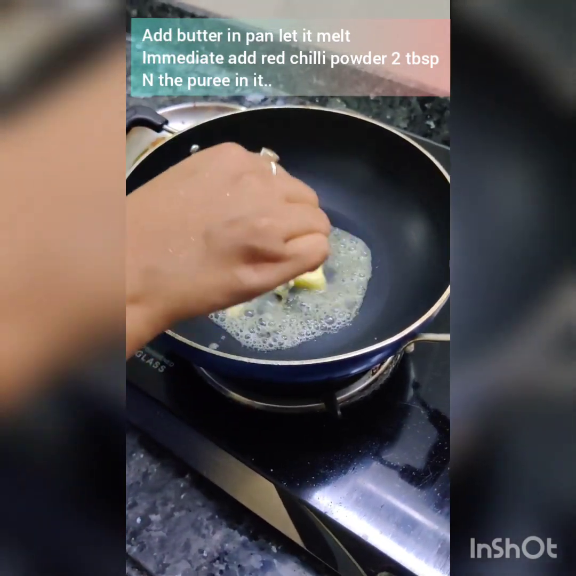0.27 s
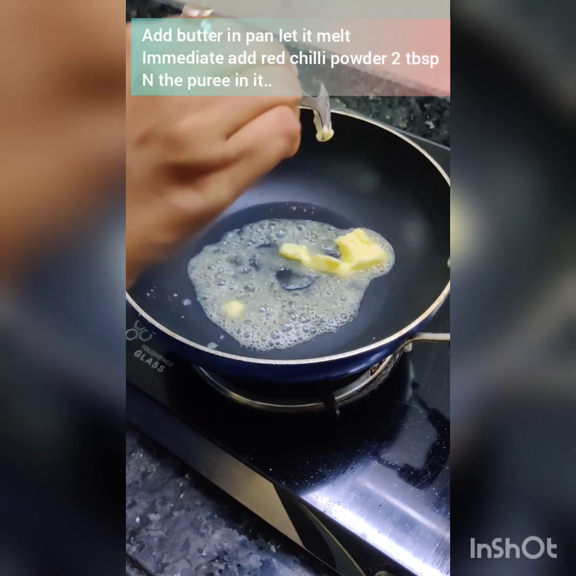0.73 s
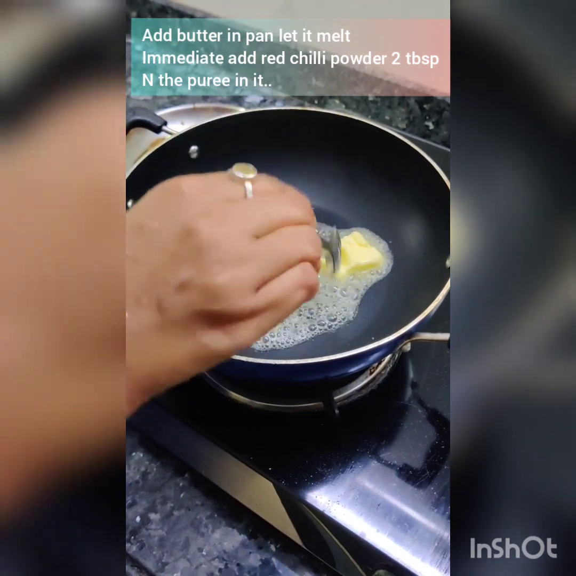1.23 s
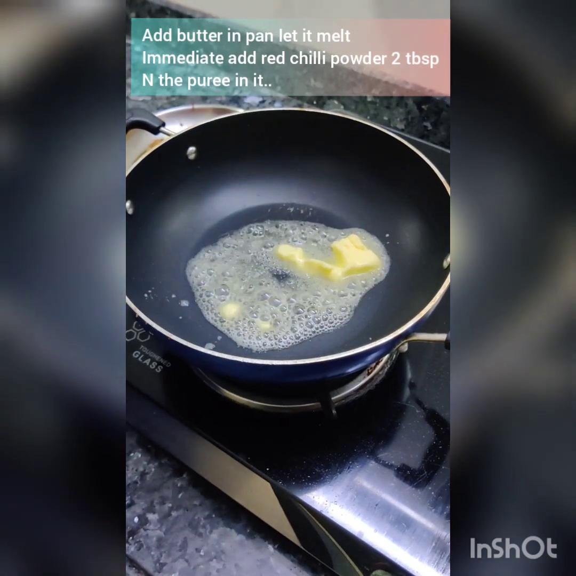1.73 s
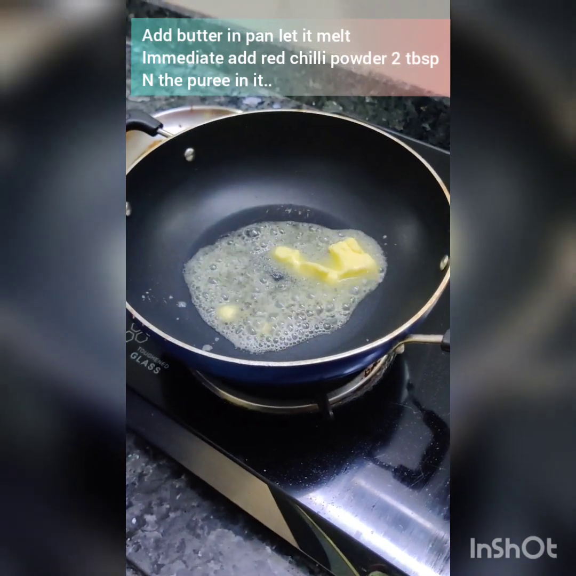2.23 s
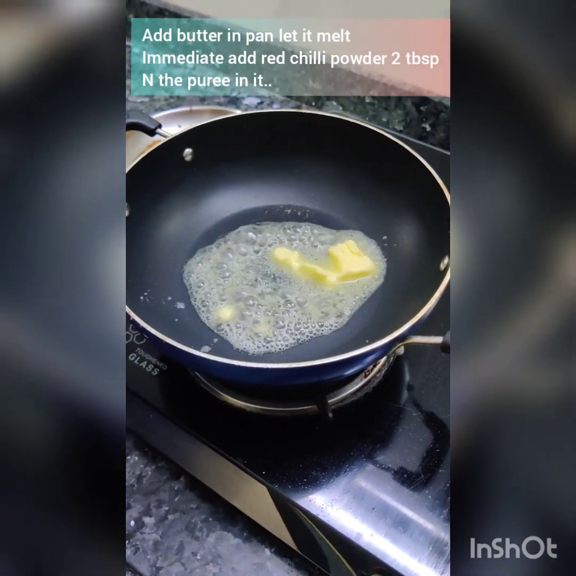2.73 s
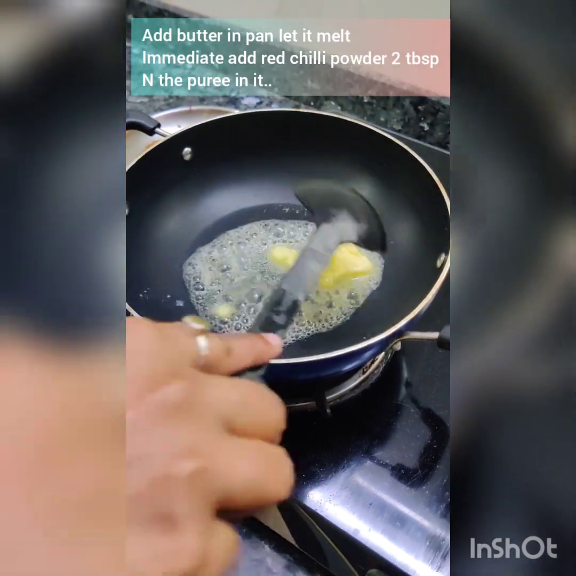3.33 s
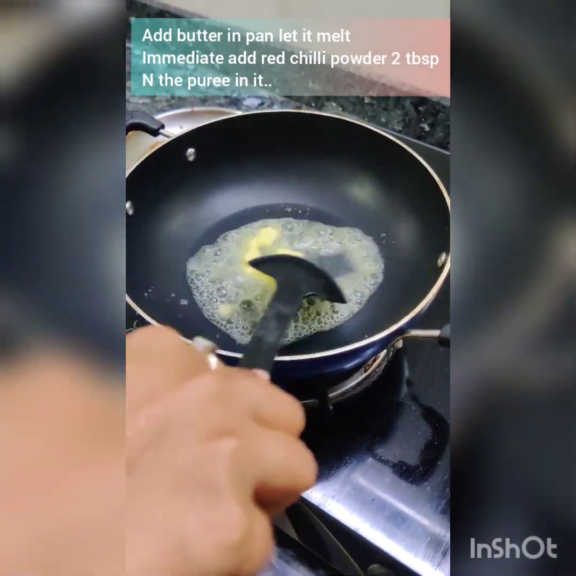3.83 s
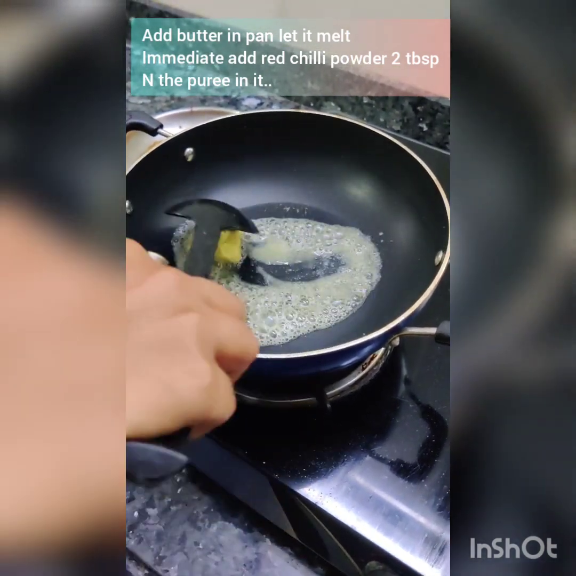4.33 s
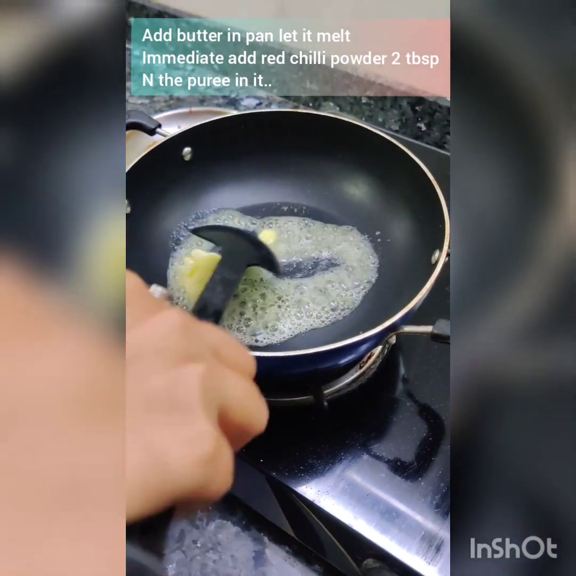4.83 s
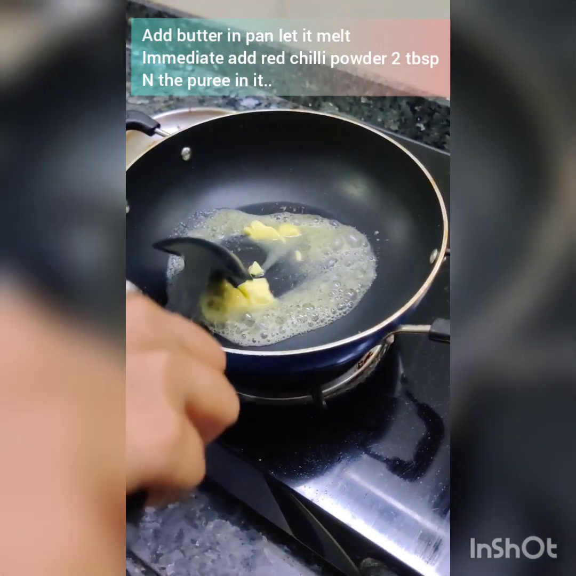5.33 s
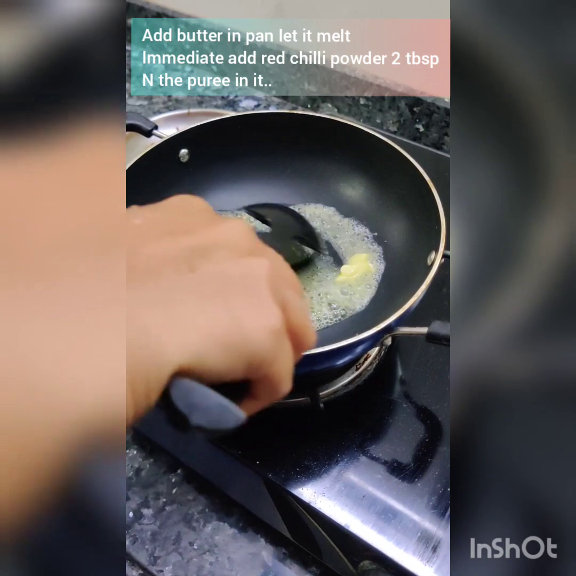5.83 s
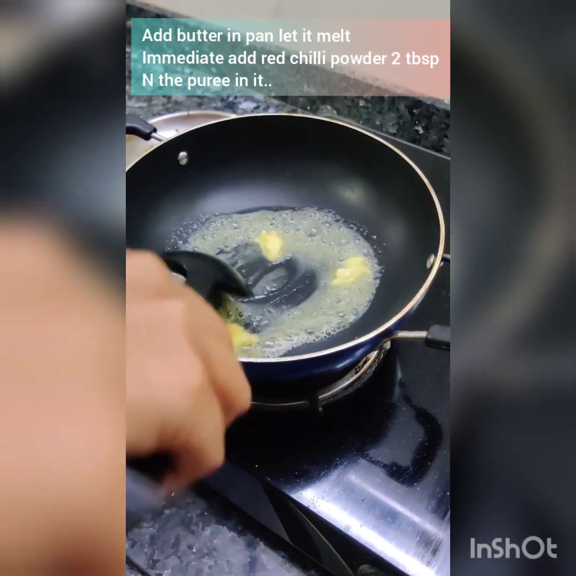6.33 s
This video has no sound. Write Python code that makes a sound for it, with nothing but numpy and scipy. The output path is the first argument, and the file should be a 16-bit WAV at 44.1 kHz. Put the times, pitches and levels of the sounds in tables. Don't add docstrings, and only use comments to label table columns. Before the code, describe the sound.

Butter sizzles and spits close up in a coated pan while a spatula knocks and scrapes it and a spoon clinks on stone.

```python
import sys
import numpy as np
from scipy import signal
from scipy.fft import rfft, irfft, next_fast_len
from scipy.io import wavfile
from scipy.ndimage import uniform_filter1d

SR = 44100
rng = np.random.default_rng(int(sys.argv[2]) if len(sys.argv) > 2 else 0)


def transcribe(signal):
    frames = np.atleast_2d(signal).T
    limited = np.clip(frames, -1, 1)
    pcm = np.round(limited * 32767).astype(np.int16)
    wavfile.write(sys.argv[1], SR, pcm)


def linear_from_db(decibels):
    return 10 ** (np.asarray(decibels, float) / 20)


N = 290927

# frequency in Hz, level in dB, t60 in seconds.
PAN_MODES = [(816, -15, 0.033), (860, -3, 0.03), (919.5, -0.5, 0.065), (960, -8, 0.03), (987, 2, 0.045),
             (1060, -6, 0.024), (1204, -9, 0.062), (1346, -6.5, 0.039), (1510, -3, 0.019), (1710, 1, 0.025),
             (1890, -4, 0.022), (2174, -9, 0.046), (2610, 1.5, 0.01), (2916, -10.5, 0.055),
             (3173, -4.5, 0.039), (3540, -12, 0.011), (4310, -7, 0.021), (4870, -28, .015),
             (6300, -30, .02)]


def evened(x):
    return x / np.sqrt(np.mean(x ** 2) + 1e-20)


def read(points, hz):
    f, value = np.transpose(points)
    return np.interp(np.log(hz + 1), np.log(f + 1), value)


def curve(rows):
    s, db = np.transpose(rows)
    return linear_from_db(np.interp(np.arange(N) / SR, s, db, -120, -120))


def add(mix, s, sound):
    part = mix[..., round(s * SR):][..., :sound.shape[-1]]
    part += sound[..., :part.shape[-1]]


def side_gains(db, left_right_db):
    return linear_from_db(db + np.array([[.5], [-.5]]) * left_right_db)


def slow_waver(samples):
    once = uniform_filter1d(rng.standard_normal(N), samples)
    return evened(uniform_filter1d(once, samples))


def coloured(x, points):
    log_gain = read(points, abs(np.fft.fftfreq(2048, 1 / SR))) * np.log(10) / 20
    taps = np.fft.ifft(np.exp(np.conj(signal.hilbert(log_gain)))).real[:1024]
    return signal.oaconvolve(x, taps[None], axes=1)[:, :N]


def modes(hz, t60, seconds, contact_s=0.00046):
    t = np.arange(round(seconds * SR))[:, None] / SR
    return (1 - np.exp(-t / contact_s)) * np.exp(t * (2j * np.pi * hz - np.log(1000) / t60))


def ring(bank, db, phase):
    return (bank @ (linear_from_db(db) * np.exp(1j * phase))).imag


def stroke(start, hold, db, press_s=0.011, lift_db_per_s=167):
    age = np.arange(N) / SR - start
    lift_db = lift_db_per_s * np.maximum(age - press_s - hold, 0)
    return np.clip(age / press_s, 0, 1) * linear_from_db(db - lift_db)


def late(x):
    return np.array([x[0], np.roll(x[1], 16)])


def fan():
    # multiple of the shaft speed, level in dB rms, frequency waver in Hz.
    shaft_orders = [(1, -53.5, .1), (2, -67, 0.049), (3, -56, 0.054), (5, -43.5, 0.13), (6, -74, 0.35),
                    (10, -60, 4.04), (14.9, -52.5, 5.66)]
    # frequency in Hz, level in dB per Hz.
    air_spectrum = [(12, -32), (20, -10), (45, -2), (75, -11.5), (105, -10), (140, -9.5), (230, -15),
                    (400, -16.5), (650, -17.5), (1000, -23), (2500, -34.5), (4000, -46)]
    # frequency in Hz, correlation from 0 to 1.
    air_likeness = [(20, .996), (180, .995), (250, .93), (350, .7), (600, .35), (1000, .2), (2500, .2)]
    shaft_hz, mains_hz, mains_db, air_db = 22.21, 101, -44.5, -42

    t = np.arange(N) / SR
    tones = linear_from_db(mains_db) * np.sin(2 * np.pi * mains_hz * t + 1.07)
    for multiple, db, waver_hz in shaft_orders:
        drift = slow_waver(3000)
        phase = 2 * np.pi * np.cumsum(multiple * shaft_hz + waver_hz * drift) / SR
        tones = tones + linear_from_db(db + 3.05 * np.roll(drift, SR)) * np.sin(phase)

    frames, hz = N // 512 + 5, np.fft.rfftfreq(2048, 1 / SR)
    a, b, c, d = rng.standard_normal((frames, 1025, 4)).T
    same = np.clip(read(air_likeness, hz), -1, 1)[:, None]
    left, other = a + 1j * b, c + 1j * d
    right = same * left + np.sqrt(1 - same ** 2) * other
    spectra = np.array([left, right]) * linear_from_db(read(air_spectrum, hz))[:, None]
    air = signal.istft(spectra, nperseg=2048, noverlap=1536)[1][:, :N]
    return np.sqrt(2) * tones + linear_from_db(air_db) * evened(air)


def kitchen(sources, turns_per_s=3.7):
    # frequency in Hz, t60 in seconds.
    room_t60 = [(200, 0.39), (1000, 0.56), (4000, 0.58), (8000, 0.19), (16000, 0.034)]
    taps = np.zeros((6, SR // 2))
    at = np.arange(160, SR // 2 - 20, 20)
    at = at + rng.integers(0, 20, (6, (SR // 2 - 161) // 20))
    np.put_along_axis(taps, at, rng.choice([-1., 1.], at.shape), 1)

    hz, t, z = signal.stft(taps, SR, nperseg=256)
    decay = linear_from_db(-60 * t / read(room_t60, hz)[:, None]) * (hz[:, None] > 250)
    tail = signal.istft(z * decay, SR, nperseg=256)[1]
    tail = tail / np.linalg.norm(tail[0])

    sent = sum(linear_from_db(echo_db) * x.mean(0) for x, echo_db in sources)
    pattern = np.repeat(np.arange(3), 2)[:, None]
    turn = np.sqrt(2 / 3) * np.cos(np.pi * (turns_per_s * np.arange(N) / SR + pattern / 3))
    echoes = signal.fftconvolve(sent * turn, tail, axes=1)[:, :N]
    return late(sum(x for x, _ in sources)) + echoes.reshape(3, 2, N).sum(0)


def steel_on_stone(table, hits, tick_db):
    hz, left_db, right_db, t60 = np.transpose(table)
    bank, out = modes(hz, t60, .5), np.zeros((2, N))
    for (s, db, left_right_db, hard), draw in zip(hits, rng.random((len(hits), 2, 200))):
        sides = side_gains(db, left_right_db)
        tilt_db = hard * np.log2(hz / 5500)
        phases = 2 * np.pi * draw[:, :len(hz)]
        left = ring(bank, left_db + tilt_db, phases[0])
        right = ring(bank, right_db + tilt_db, phases[1])
        add(out, s, sides * np.array([left, right]))
        tick = signal.lfilter([1, 0, -1], [1, -.85, .68], (draw - .5) * np.hanning(200))
        add(out, s, sides * linear_from_db(tick_db) * tick)
    return out


def spoon():
    # frequency in Hz, left level in dB, right level in dB, t60 in seconds.
    handle_modes = [(5730, -24, -23, 0.12), (5860, -28, -16, 0.082), (6000, -20, -25, .15),
                    (5910, -15, -10, 0.12), (5980, -17, -25, 0.19), (6145, -20, -18, 0.14),
                    (6270, -25, -12, 0.14), (6100, -21, -22, 0.12), (6850, -26, -24, .15),
                    (9400, -25, -24, 0.096), (9400, -23, -21, 0.077), (9504, -13, -11.5, 0.1),
                    (12100, -26, -28, .08)]
    bowl_modes = [(1496, -29, -16, 0.37), (1506, -28, -20, 0.41), (1517, -35, -14, .3),
                  (1910, -31, -19, .05), (2644, -28, -19, 0.1), (3283, -17, -15, 0.55),
                  (3299, -17, -19, 0.45), (5546, -8, -19, 0.22), (5572, -16, -22, 0.15),
                  (5600, -26, -27, .15), (5659, -33, -21, 0.14), (6390, -23.5, -24, .25),
                  (6423, -24.5, -28, 0.17), (6896, -30, -17, .15), (8250, -31, -23, .15),
                  (8306, -31, -14, 0.13), (8335, -25, -13, 0.16), (8350, -29, -18, .18),
                  (8700, -30, -28, .15), (8967, -33, -27, 0.16), (11610, -26, -20, 0.27),
                  (11633, -25, -23, .17), (12086, -31, -21, .2), (12630, -29, -25, 0.15),
                  (15060, -26, -27, 0.15), (15320, -27, -24, 0.13)]
    # start in seconds, level in dB, left-right in dB, hardness in dB per octave.
    handle_hits = [
        (2.1027, -15.5, 2, -4),
        (2.1094, -20, 0, -3),
        (2.111, -15, -5, -12),
        (2.114, -29, -2, -3),
        (2.121, -26, 4, -5),
        (2.152, -32, 0, 3),
    ]
    bowl_hits = [
        (2.1879, -23, -9.5, -4),
        (2.1914, -15, -1, 0),
        (2.203, -19.5, -16, 1.5),
        (2.2259, -18, -4, 4),
        (2.247, -24.5, 7, -1),
        (2.268, -27, -12, -1),
    ]
    return steel_on_stone(handle_modes, handle_hits, -7.0) + steel_on_stone(bowl_modes, bowl_hits, -8.0)


def grind():
    hz, width_hz = 279, 91
    r = np.exp(-np.pi * width_hz / SR)
    poles = [1, -2 * r * np.cos(2 * np.pi * hz / SR), r * r]
    rumble = signal.lfilter([1], poles, rng.standard_normal(N))
    rumble = signal.lfilter([1, -1], poles, rumble)
    return stroke(start=5.87, hold=.6, db=-48.5) * evened(rumble)


def pan_rocks():
    # start in seconds, level in dB.
    rocks = [
        (4.592, -60),
        (4.935, -29),
        (6.272, -32),
    ]
    out, t = np.zeros((2, N)), np.arange(4000) / SR
    for s, db in rocks:
        add(out, s, linear_from_db(db) * np.sin(2 * np.pi * 365 * t) * np.exp(-t / 0.01))
    return out


def pan_scrapes():
    # start in seconds, hold in seconds, pressure in dB.
    scrapes = [(0.0, .04, -38.5), (0.643, 0.056, -34.5), (0.792, .05, -52), (4.012, .005, -40.5),
               (4.66, .03, -53), (5.275, 0.17, -40), (5.45, .015, -49), (5.588, 0.22, -50),
               (5.773, 0.038, -34.5), (5.954, .015, -40.5), (6.265, 0.013, -35.5), (6.325, 0.12, -40.5),
               (6.452, 0.015, -31.5)]
    hz, mode_db, t60 = np.transpose(PAN_MODES)
    bank = modes(hz, t60, .15)
    slips = (rng.random(N) < 900 / SR) * rng.standard_normal(N)
    slips = slips * sum(stroke(*row) for row in scrapes)
    phases = 2 * np.pi * rng.random((2, len(hz)))
    body = np.array([ring(bank, mode_db - 3.0 * np.log2(hz / 950), phase) for phase in phases])
    body = body / np.linalg.norm(body[0])
    return linear_from_db([[17], [14.5]]) * signal.oaconvolve(slips[None], body, axes=1)[:, :N]


def pan_knocks(crack_db=-6.0, crack_s=0.0069):
    # start in seconds, peak level in dB, hardness in dB per octave, left-right in dB.
    knocks = [(.002, -21, -2, -3), (.455, -24, -3, 14), (.468, -21.5, -1, 1), (0.602, -23, 4, 0),
              (.612, -10, 2.5, 5.5), (0.6208, -14.5, 5, 3), (.633, -17.5, 3.5, -8), (.66, -20, -4, 5),
              (4.028, -27, -13, 2), (4.593, -18.5, -2, 4.5), (4.68, -31, -4, 2), (4.9276, -8.5, -2, 1),
              (4.9362, -23.5, 4.5, -8), (4.99, -24, 0, -5), (5.293, -22, -5, 8.5), (5.405, -33, -4, -7),
              (5.477, -25, -10, 1), (5.661, -32, 2, 5), (5.799, -24, 3.5, 3), (5.844, -22.5, 0, 4),
              (5.972, -33.5, 8, 6), (5.994, -28, 4.5, 1), (6.019, -26, 2.5, 4), (6.272, -12.5, -14, 4),
              (6.296, -28, 1, 6), (6.327, -24, -0.5, 6), (6.436, -26, -6, 3), (6.464, -30, -6, 5),
              (6.49, -31, 4.5, -7)]
    hz, mode_db, t60 = np.transpose(PAN_MODES)
    bank, out, t = modes(hz, t60, .15), np.zeros((2, N)), np.arange(600) / SR
    crack_poles = np.convolve([1, -1.6, .72], [1, -.6])
    for (s, db, hard, left_right_db), draw in zip(knocks, rng.standard_normal((len(knocks), 3, 600))):
        spot = draw[:, :len(hz)]
        struck_db = mode_db + hard * np.log2(hz / 950) + 2.2 * spot[0]
        blow = np.array([ring(bank, struck_db, 2.04 * spot[k]) for k in (1, 2)])
        sides = side_gains(db, left_right_db)
        add(out, s, sides * blow / abs(blow).max())
        crack = signal.lfilter([.45, 0, -.45], crack_poles, draw[1:] * np.exp(-t / crack_s))
        add(out, s, sides * linear_from_db(crack_db + 2.36 * hard) * 0.14 * crack)
    return out


def spits(side_db=4.0):
    # start in seconds, peak level in dB.
    loud_spits = [(0.2293, -25), (1.4294, -21), (1.596, -22), (1.8074, -19), (1.8401, -21), (1.8661, -23),
                  (1.9708, -24), (2.0322, -27), (2.7355, -23), (2.831, -19), (2.845, -27), (2.8604, -22),
                  (3.0654, -22.5), (3.2921, -20), (3.4836, -20), (3.5043, -27), (4.196, -24), (4.311, -23),
                  (4.544, -22), (4.721, -24), (4.9564, -25), (4.999, -22.5), (5.3123, -29), (5.445, -22),
                  (5.5326, -21), (6.1388, -26), (6.2905, -20)]
    out, t = np.zeros((2, N)), np.arange(120) / SR
    for (s, db), (a, b) in zip(loud_spits, rng.random((len(loud_spits), 2))):
        age = t / (.0002 + .0002 * b)
        snap = np.sin(2 * np.pi * (5300 + 1600 * a) * t) * age * np.exp(1 - age)
        add(out, s, side_gains(db - 7.5, side_db) * snap)
    return out


def sizzle(per_s=4500, spread_db=4.0, hiss_db=4.0, right_db=-30.0, gust_db=1.74, shared=0.27, count=9):
    # time in seconds, level in dB.
    foam = [(0.0, -30), (0.85, -31), (2.09, -33), (2.24, -29), (2.5, -34), (2.92, -32.5), (3.73, -34),
            (5.38, -34), (5.58, -33), (6.6, -33)]
    # frequency in Hz, level in dB per Hz.
    burst_spectrum = [(80, -59), (300, -26), (900, -15.5), (1500, -4.5), (2500, -2.5), (4000, 0),
                      (6000, -1), (8000, -2.5), (10000, -5.5), (13000, -9), (16000, -8)]

    gusts = linear_from_db(gust_db * slow_waver(900))
    size = linear_from_db(spread_db * np.minimum(rng.exponential(1, N), 4.5))
    size *= rng.random(N) < gusts * per_s / SR
    size *= rng.choice([-1., 1.], N)
    kind, near = rng.integers(0, count, N), np.zeros((2, N))
    for k, hz in enumerate(np.geomspace(3100, 13500, count)):
        paths = np.zeros((2, 400))
        bounce = rng.integers(12, 400, (2, 12))
        strength = 1.03 * rng.standard_normal((2, 12)) * linear_from_db(-.045 * bounce)
        np.put_along_axis(paths, bounce, strength, 1)
        paths[:, 0] = 1, linear_from_db(right_db)
        cycles = np.arange(0, 3.5, hz / SR)
        bubble = np.sin(2 * np.pi * cycles) * cycles * np.exp(-cycles / 0.61)
        heard = signal.convolve(paths, bubble[None] / np.linalg.norm(bubble))
        bursts = (size * (kind == k))[None]
        near += signal.oaconvolve(bursts, heard, axes=1)[:, :N] * (hz / 6000) ** 0.075
    near /= np.sqrt((near ** 2).mean(1, keepdims=True))

    fine = rng.standard_normal((3, N))
    hiss = np.sqrt(1 - shared) * fine[:2] + np.sqrt(shared) * fine[2]
    blur = linear_from_db(hiss_db) * np.sqrt(gusts) * hiss
    return linear_from_db(-5.0) * curve(foam) * evened(coloured(late(near + blur), burst_spectrum))


def scene():
    pan = pan_knocks() + pan_rocks() + pan_scrapes()
    struck = kitchen([(spits(), -5.5), (pan, -4.5), (spoon(), -4.5)])
    return fan() + grind() + struck + sizzle()


def low_pass(x):
    return signal.sosfilt(signal.butter(12, 17010, fs=SR, output="sos"), x)


def record(dry):
    # frequency in Hz, width in Hz, level in dB.
    ports = [
        [(5890, 805, 17.5), (9450, 2400, -9.5)],
        [(9830, 1400, 11.5), (7970, 24400, 5)],
    ]
    size = next_fast_len(N + 2048)
    hz, heard = np.fft.rfftfreq(size, 1 / SR), []
    for x, port in zip(dry, ports):
        lift = 1
        for f, width, db in port:
            damping = 1j * hz * width
            lift = lift * (1 + (linear_from_db(db) - 1) * damping / (f ** 2 - hz ** 2 + damping))
        heard.append(irfft(rfft(x, size) * lift * (hz < 15800), size)[:N])
    return low_pass(np.array(heard))


dry = scene()
out = record(dry)
transcribe(out)
```